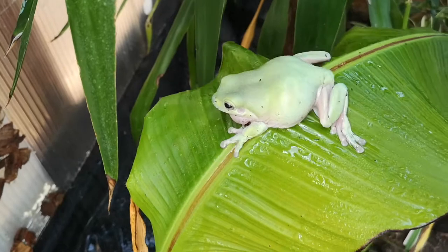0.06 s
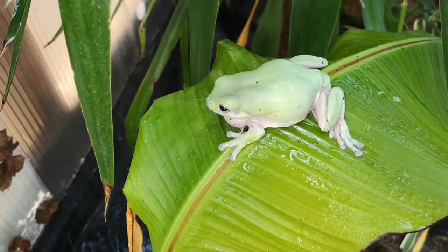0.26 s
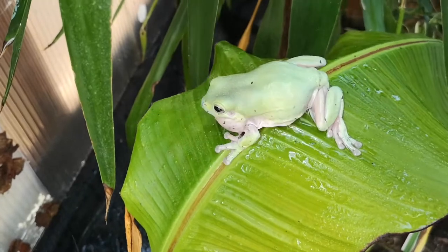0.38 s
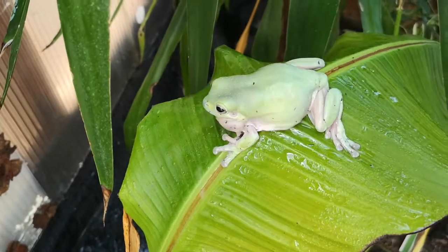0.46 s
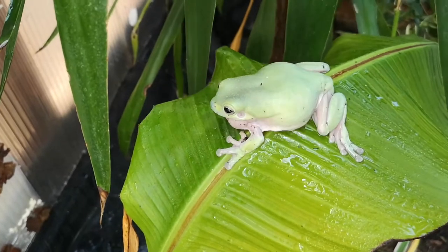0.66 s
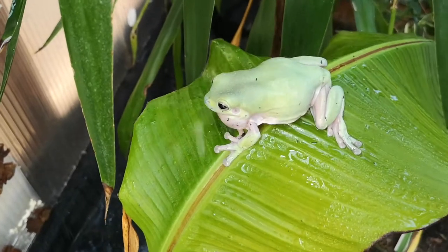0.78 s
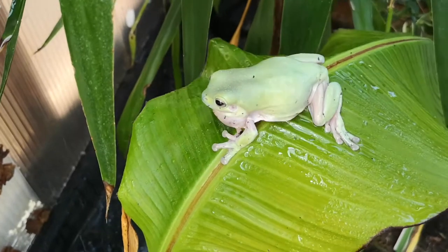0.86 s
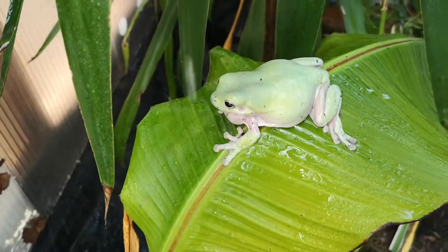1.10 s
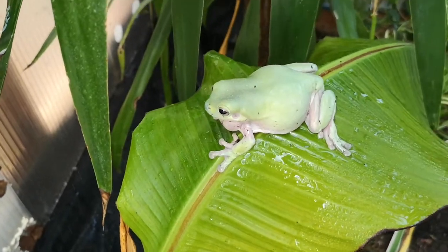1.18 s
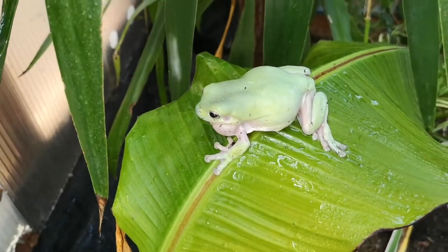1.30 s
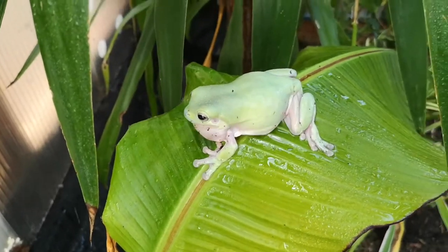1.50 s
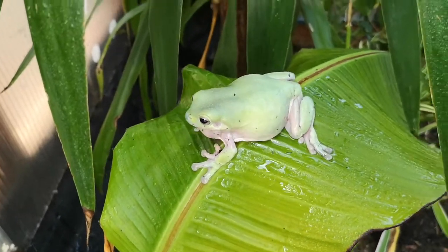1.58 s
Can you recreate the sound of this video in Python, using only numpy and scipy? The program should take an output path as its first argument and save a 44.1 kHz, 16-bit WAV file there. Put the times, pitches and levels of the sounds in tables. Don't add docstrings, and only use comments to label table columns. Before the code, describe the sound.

Three short, dry, throaty frog croaks, roughly half a second apart, sound close to a stereo microphone with brief leaf and room reflections. A blurred far frog answers faintly over soft running water and handling rumble.

```python
import sys
import numpy as np
from scipy import signal
from scipy.fft import rfft, irfft, next_fast_len
from scipy.io import wavfile
from scipy.ndimage import uniform_filter1d, map_coordinates

SR = 44100
rng = np.random.default_rng(int(sys.argv[2]) if len(sys.argv) > 2 else 0)


def nominal_scale(level):
    x = np.asarray(level, float) / 20
    return 10 ** x


def unload_wav(signal):
    wavfile.write(
        sys.argv[1],
        SR,
        np.round(np.clip(np.atleast_2d(signal).T, -1, 1) * 32767).astype(np.int16),
    )


N = 72765


def unit(x):
    return x / np.sqrt(np.mean(x ** 2) + 1e-20)


def along(points, hz):
    f, v = np.transpose(points)
    return np.interp(np.log(hz + 1), np.log(f + 1), v)


def wobble(rate_hz):
    knots = rng.standard_normal(int(N * rate_hz / SR) + 4)
    return map_coordinates(knots, [np.arange(N) * rate_hz / SR])


def swell(start_s, length_s):
    return np.sin(np.pi * np.clip((np.arange(N) / SR - start_s) / length_s, 0, 1)) ** 2


def filtered(x, response):
    m = next_fast_len(N + SR // 2)
    return irfft(rfft(x, m) * response(np.fft.rfftfreq(m, 1 / SR)), m)[..., :N]


def ring(f, hz, width_hz):
    return 1j * f * width_hz / (hz * hz - f * f + 1j * f * width_hz)


def throat_clicks():
    # t/s, rate/(clicks per s)
    click_rates = [
        [(.1622, 118), (.2046, 151), (.2134, 135), (.2234, 199), (.2435, 123), (.2612, 171), (.3313, 172),
         (.3419, 123), (.395, 65)],
        [(.6388, 113), (.6591, 126), (.7115, 184), (.717, 116), (.7593, 172), (.798, 164), (.801, 93),
         (.8511, 85), (.875, 116)],
        [(1.2147, 170), (1.247, 175), (1.2565, 125), (1.271, 128), (1.284, 190), (1.31, 135), (1.326, 174),
         (1.36, 142), (1.45, 90)],
    ]
    # t/s, click peak/dB, squeak/dB, boom/dB
    efforts = [
        [(.16, -34, -18, -1), (.19, -36, -20, 11.5), (.21, -27, -3, 9.5), (.222, -21, 4.5, 3),
         (.25, -12.5, -9.5, -2.5), (.275, -10.5, -49, -6.5), (.335, -15.5, -10.5, 0.5), (.343, -21.5, -21, 7.5),
         (.4, -40, -23, -2)],
        [(.638, -38.5, -24, 7.5), (.672, -26.5, -16, 9), (.69, -17.5, -1, -9), (.698, -13.5, -9.5, 3),
         (.725, -9.5, -31, -3.5), (.798, -13.5, -28, -1.5), (.806, -14.5, -12, 5.5), (.84, -28, 0, 6),
         (.88, -46.5, -6, 13.5)],
        [(1.21, -40, -5, -2), (1.228, -28, -8, 2.5), (1.238, -21, -25, -3.5), (1.28, -11, -28, 0),
         (1.33, -13.5, -9.5, 0.5), (1.36, -18.5, -6.5, 8), (1.398, -23.5, -10, 8.5), (1.406, -27.5, -4, 1.5),
         (1.455, -44.5, -6, 8)],
    ]
    jitter_s, size_db, colour_db, lead_s = .0001, .5, .8, .0014
    peak_db, high_grows = -9, 1.05
    t = np.arange(N) / SR
    clicks = np.zeros((4, N))
    for rate, effort in zip(click_rates, efforts):
        rate_s, per_s = np.transpose(rate)
        span = t[(t >= rate_s[0]) & (t < rate_s[-1])]
        turns = np.cumsum(np.interp(span, rate_s, per_s)) / SR
        luck = rng.standard_normal((60, 6))[:int(turns[-1]) + 1]
        when = np.interp(np.arange(len(luck)), turns, span) + jitter_s * luck[:, 0]
        effort_s, *controls = np.transpose(effort)
        level, squeak, boom = [np.interp(when, effort_s, c) for c in controls]
        below = level - peak_db
        below = below + size_db * luck[:, 1] * (1 - .07 * below)
        group_db = np.array([below + boom, below, high_grows * below, below + squeak])
        group_db = group_db + colour_db * luck[:, 2:].T
        clicks[:, np.round((when - lead_s) * SR).astype(int)] = nominal_scale(group_db)
    return clicks


def with_rasp(clicks):
    rasp, rasp_s, rasp_grows = .33, .0045, .75
    decay = np.exp(-np.arange(900) / SR / rasp_s)
    puff = signal.fftconvolve(clicks ** rasp_grows, decay[None], axes=1)[:, :N]
    gain = rasp / np.sqrt(rasp_s * SR / 2)
    return clicks[:, None] + gain * puff[:, None] * rng.standard_normal((2, N))


def sac_response(modes, f):
    low_hz, high_hz, floor_hz, right_lag_s = 475, 2106, 450, .000367
    ratios = low_hz / (1j * f + 1e-9), 1j * f / high_hz
    edges = np.prod([1 / (1 + 2 * damping * r + r * r) for damping in (.38, .92) for r in ratios], axis=0)
    floor = 1 + (floor_hz / (f + 1)) ** 10
    lag = np.exp(-2j * np.pi * f * np.array([[0], [right_lag_s]]))
    rings = sum(np.array([[left], [right]]) * ring(f, hz, width) for hz, width, left, right in modes)
    return edges * lag / floor * rings


def frog():
    # f/Hz, width/Hz, left gain, right gain
    low_modes = [(672, 210, 1.3, 1.1), (807, 780, -.11, -.56)]
    mid_modes = [(1075, 170, -.36, .55), (1270, 296, -.96, 1.85), (1446, 213, -.41, -1.1),
                 (1710, 217, .8, -.5)]
    high_modes = [(2550, 163, -.85, .2), (3392, 309, -2.1, -.6), (3301, 262, 2.8, 1.2)]
    squeak_modes = [(1880, 220, 1.3, 1.9), (2480, 320, -2, -1)]
    groups = low_modes, mid_modes, high_modes, squeak_modes
    ports = with_rasp(throat_clicks())
    return 11.14 * sum(filtered(x, lambda f: sac_response(modes, f)) for x, modes in zip(ports, groups))


def tail(x, t60_s):
    t = np.arange(SR // 4) / SR
    h = rng.standard_normal((2, len(t))) * nominal_scale(-60 * t / t60_s) * (1 - np.exp(-t / 0.0028))
    return signal.fftconvolve(x, h / np.linalg.norm(h[0]), axes=1)[:, :N]


def far_frog():
    # t/s, length/s, level/dB, centre f/Hz
    calls = [
        (0.074, 0.27, -40.5, 1740),
        (.51, 0.044, -44.5, 930),
        (0.554, 0.039, -40, 920),
        (0.964, 0.17, -43, 1620),
        (1.067, 0.067, -43, 970),
        (1.121, .05, -43, 2800),
        (1.55, 0.048, -61, 1740),
    ]
    rate_hz, width_hz, t60_s, size_db = 130, 800, .06, 2
    turns = np.cumsum(rate_hz * nominal_scale(1.1 * wobble(40))) / SR
    clicks = np.diff(np.floor(turns), prepend=0) * nominal_scale(size_db * rng.standard_normal(N))
    voice = np.zeros(N)
    for start_s, length_s, db, hz in calls:
        note = unit(filtered(clicks, lambda f: ring(f, hz, width_hz) ** 2))
        voice += nominal_scale(db) * swell(start_s, length_s) * note
    return tail(voice[None], t60_s)


def rush(spectrum, patchy_db):
    # f/Hz, correlation
    likeness = [(60, 1), (90, 1), (130, 1), (290, 0.71), (640, -0.5), (1400, 0.45), (3000, -0.029),
                (15000, 0.023)]
    z = signal.stft(rng.standard_normal((2, N)), nperseg=512)[2]
    field = uniform_filter1d(rng.standard_normal(z.shape[1:]), size=6, axis=0)
    field = uniform_filter1d(field, size=10, axis=1)
    pair = signal.istft(z * nominal_scale(patchy_db * unit(field)), nperseg=512)[1][:, :N]

    def mid_side(hz):
        turn = np.arccos(np.clip(along(likeness, hz), -1, 1)) / 2
        return nominal_scale(along(spectrum, hz)) * [np.cos(turn), np.sin(turn)]

    mid, side = filtered(pair, mid_side)
    return unit(np.array([mid + side, mid - side]))


def water_hiss():
    # f/Hz, level/(dB per Hz)
    hiss_spectrum = [(1470, -13), (2500, 2.5), (3930, -6.5), (5480, -0.5), (6380, -3), (7360, 1.5),
                     (9230, -1), (11000, -14), (15200, -14.5)]
    level_db = -45 + 0.29 * wobble(5.75) + 0.23 * wobble(15.6)
    return nominal_scale(level_db) * rush(hiss_spectrum, patchy_db=2.34)


def water_body():
    # f/Hz, level/(dB per Hz)
    body_spectrum = [(200, -6), (330, -2.5), (620, -0.5), (1100, -4.5), (1900, 1.5), (2700, -20),
                     (3900, -3), (6000, -120)]
    return nominal_scale(-48 + 1.2 * wobble(6)) * rush(body_spectrum, patchy_db=1.8)


def drips():
    # t/s, level/dB, f/Hz
    splashes = [
        (.52, -53, 4500),
        (.57, -51, 5500),
        (.99, -50, 5500),
    ]
    out = np.zeros((2, N))
    for start_s, db, hz in splashes:
        splash = unit(filtered(rng.standard_normal((2, N)), lambda f: ring(f, hz, 4400) ** 2))
        out += nominal_scale(db) * swell(start_s, 0.062) * splash
    return out


def air_rumble():
    # t/s, strength/dB
    strength = [(0.0, -48.5), (0.054, -53.5), (0.082, -49), (0.316, -55.5), (0.568, -49), (0.698, -47),
                (0.766, -58), (0.79, -49), (1.006, -48), (1.396, -52.5), (1.616, -50.5), (1.65, -49)]
    # f/Hz, level/(dB per Hz)
    rumble_spectrum = [(9, -36), (18, 9.5), (40, -10.5), (60, -10.5), (110, -15), (250, -19), (400, -26),
                       (800, -120)]
    level_db = np.interp(np.arange(N) / SR, *np.transpose(strength)) + 7
    return nominal_scale(level_db) * rush(rumble_spectrum, patchy_db=0.5)


def ducking(voice):
    duck_db, from_db, smooth_s = -1, -41, 0.02
    power = np.abs(uniform_filter1d(voice ** 2, size=900))
    power = uniform_filter1d(power, size=int(smooth_s * SR))
    return nominal_scale(duck_db * power / (power + nominal_scale(2 * from_db)))


def scene():
    near = frog()
    voice = near[:1]
    leaf = nominal_scale(-9) * tail(voice, t60_s=.03)
    room = nominal_scale(-15) * tail(voice, t60_s=.13)
    around = far_frog() + water_hiss() + water_body() + drips() + air_rumble()
    return near + leaf + room + ducking(voice[0]) * around


def low_pass(x):
    return signal.sosfilt(signal.butter(12, 16020, fs=SR, output="sos"), x)


def record(dry):
    top_hz = 15250
    mix = filtered(dry, lambda hz: hz < top_hz)
    return low_pass(mix)


dry = scene()
out = record(dry)
unload_wav(out)
```